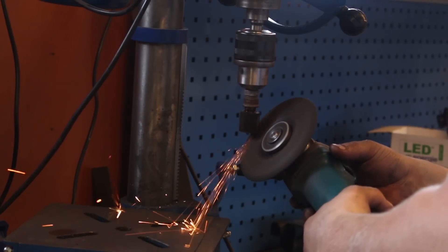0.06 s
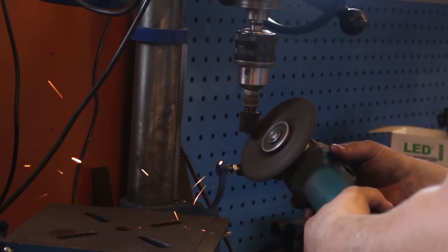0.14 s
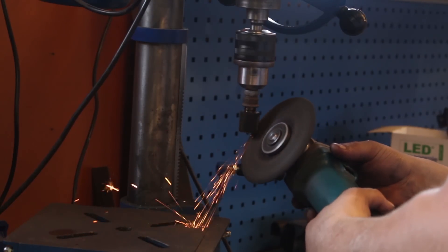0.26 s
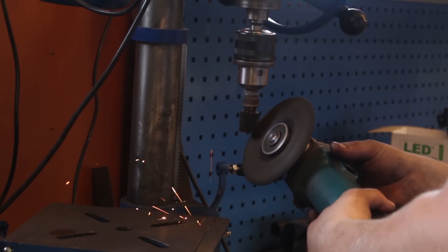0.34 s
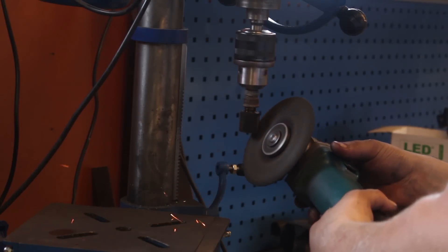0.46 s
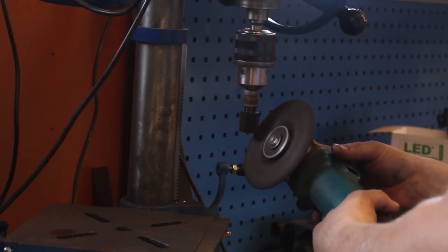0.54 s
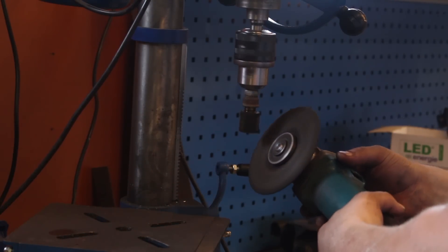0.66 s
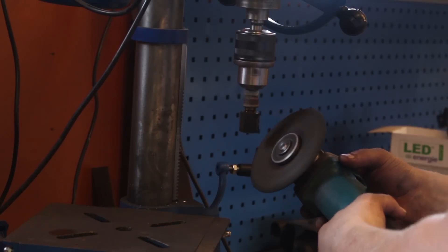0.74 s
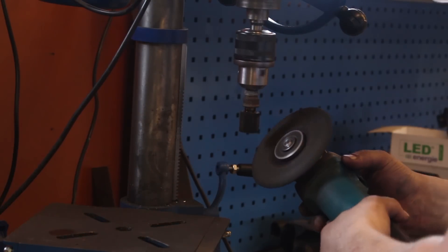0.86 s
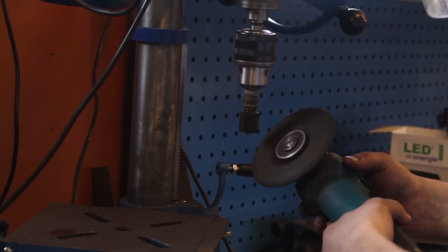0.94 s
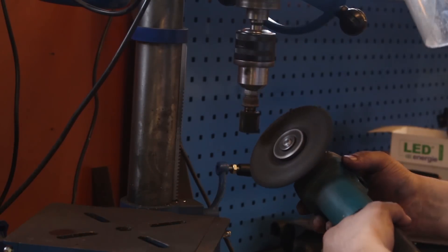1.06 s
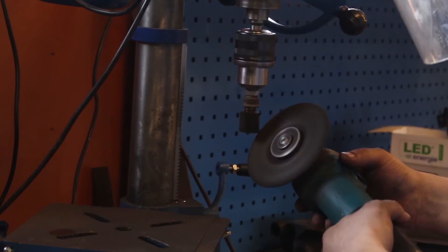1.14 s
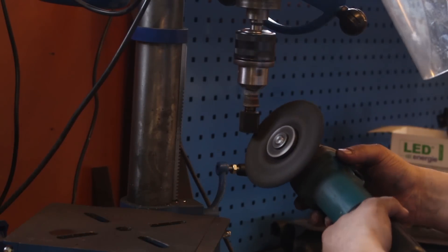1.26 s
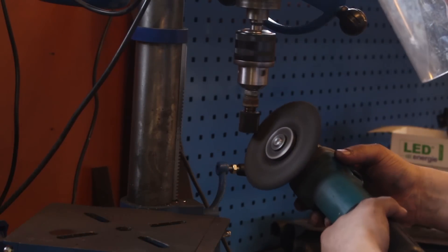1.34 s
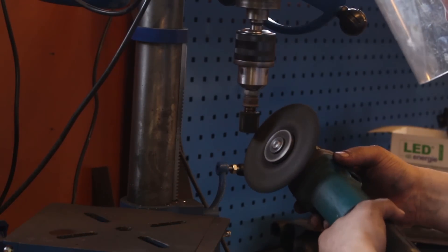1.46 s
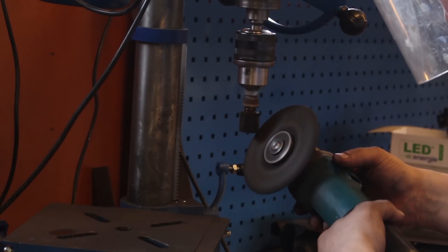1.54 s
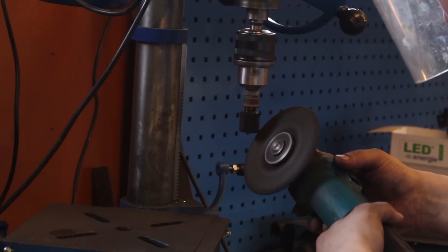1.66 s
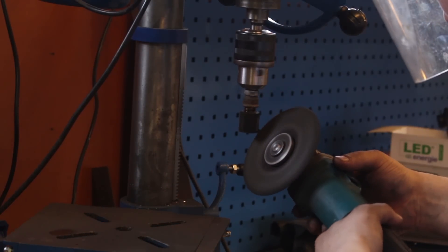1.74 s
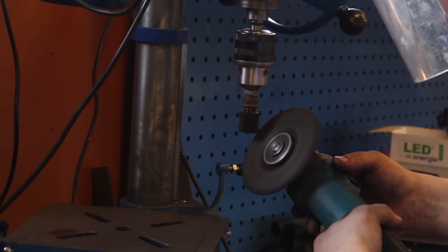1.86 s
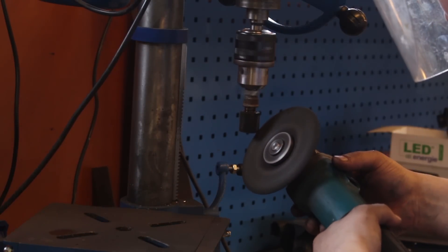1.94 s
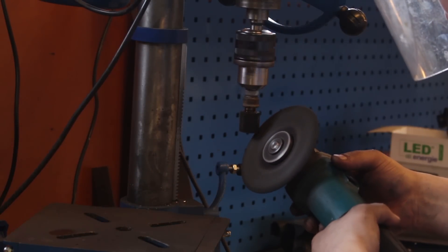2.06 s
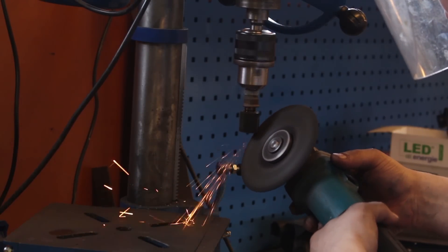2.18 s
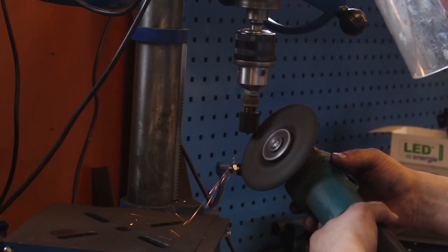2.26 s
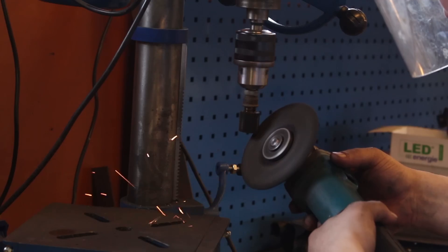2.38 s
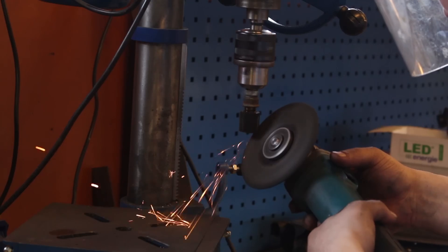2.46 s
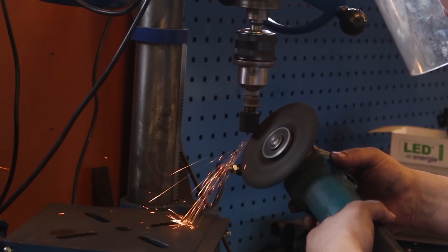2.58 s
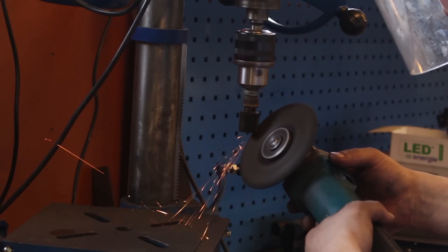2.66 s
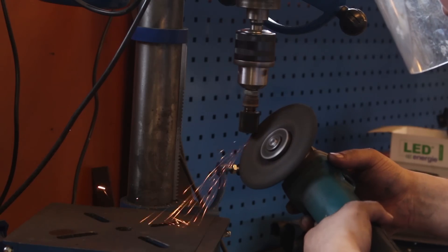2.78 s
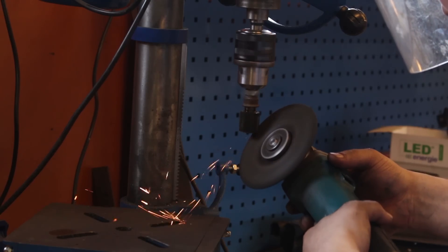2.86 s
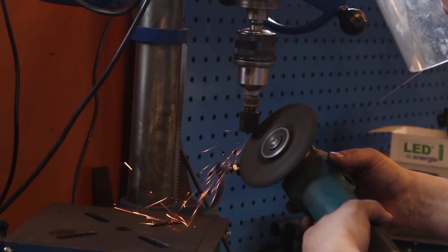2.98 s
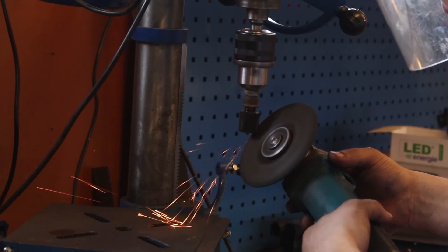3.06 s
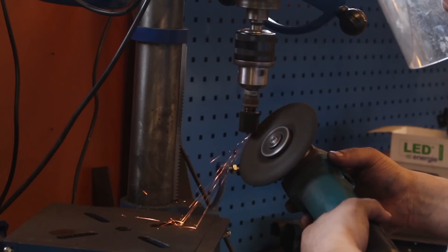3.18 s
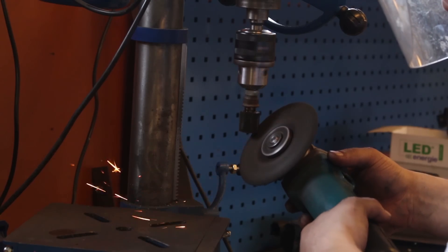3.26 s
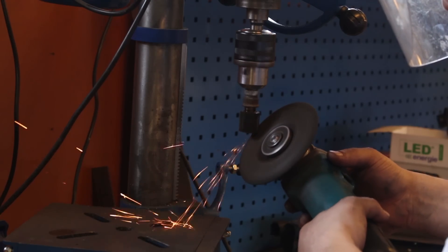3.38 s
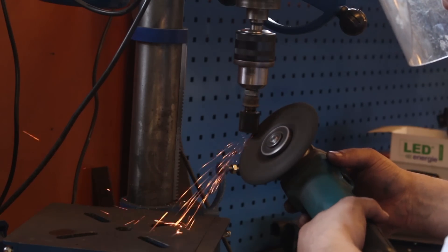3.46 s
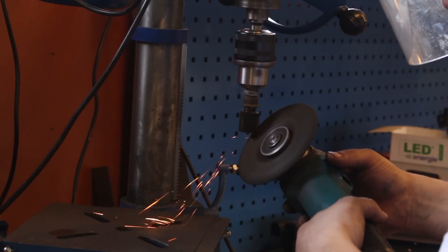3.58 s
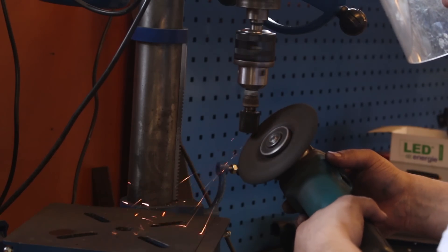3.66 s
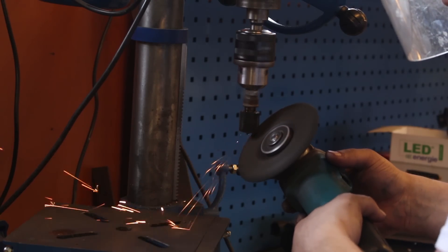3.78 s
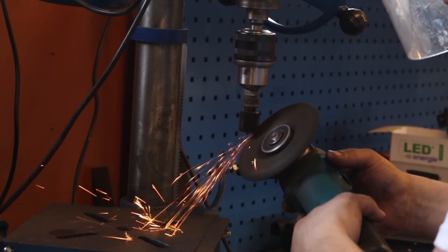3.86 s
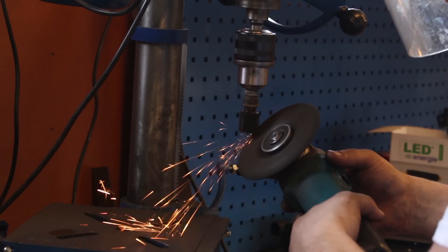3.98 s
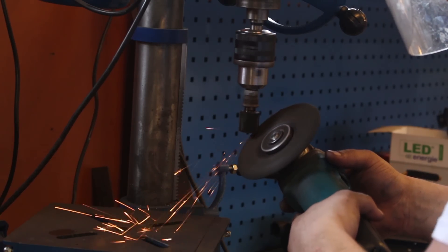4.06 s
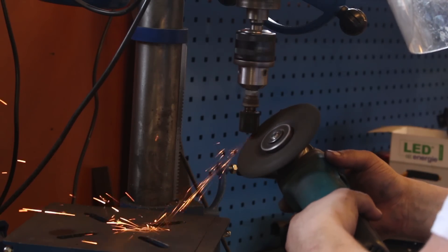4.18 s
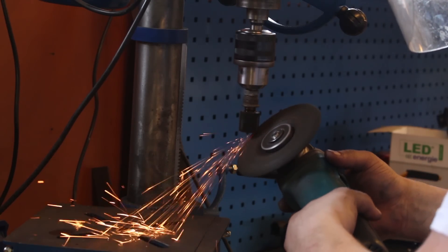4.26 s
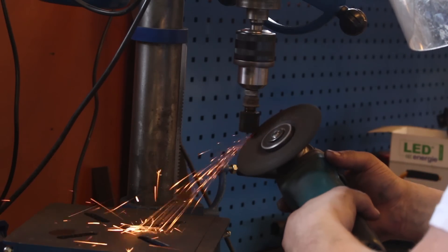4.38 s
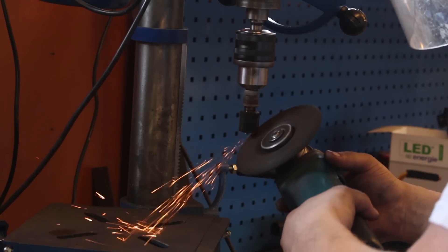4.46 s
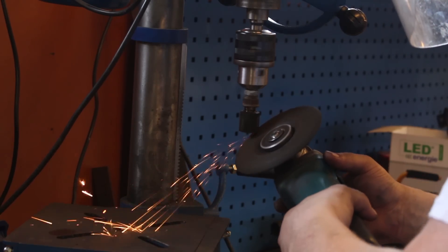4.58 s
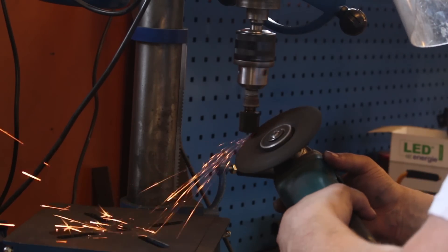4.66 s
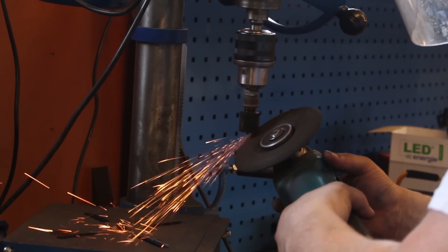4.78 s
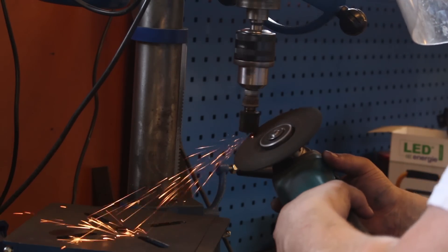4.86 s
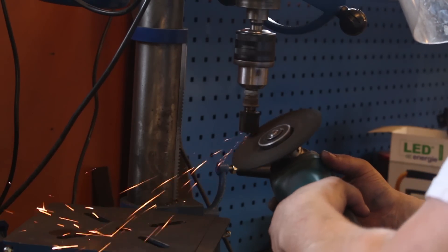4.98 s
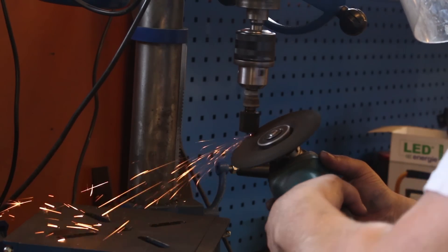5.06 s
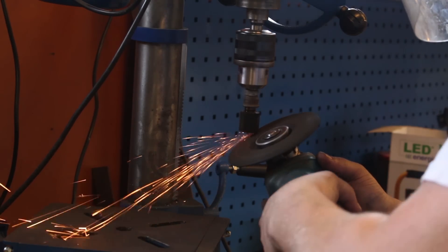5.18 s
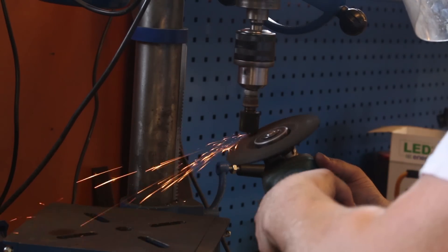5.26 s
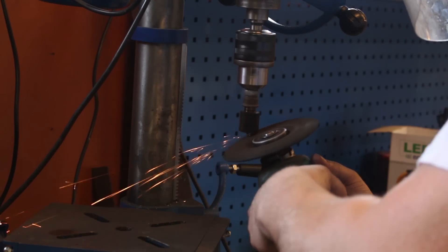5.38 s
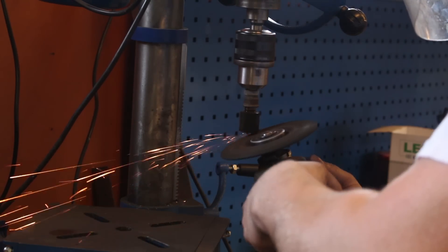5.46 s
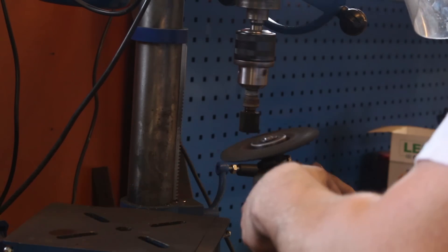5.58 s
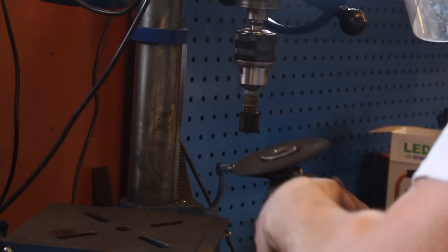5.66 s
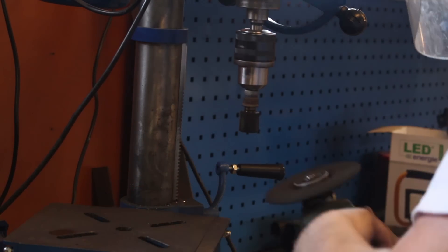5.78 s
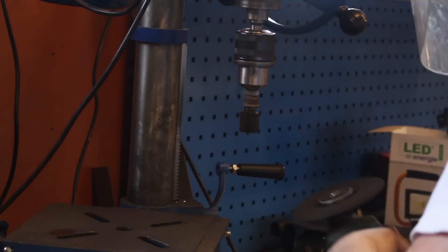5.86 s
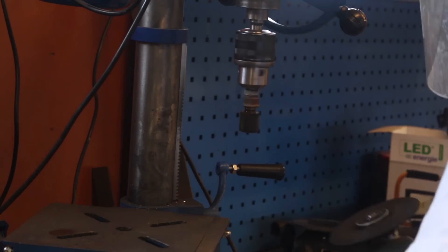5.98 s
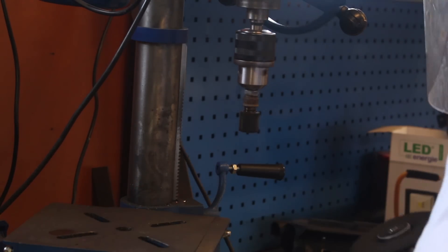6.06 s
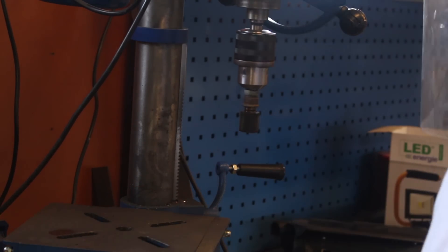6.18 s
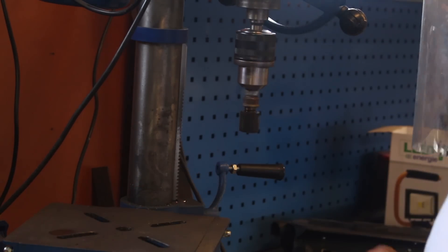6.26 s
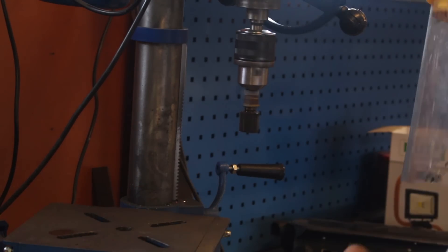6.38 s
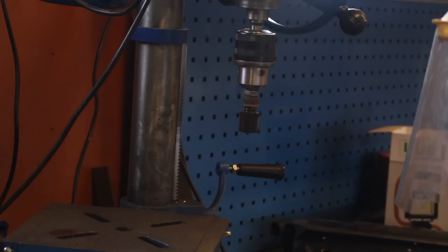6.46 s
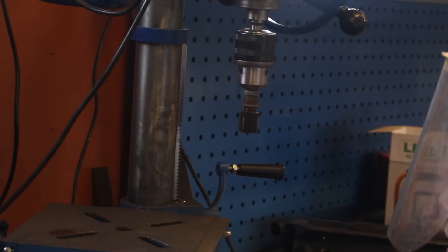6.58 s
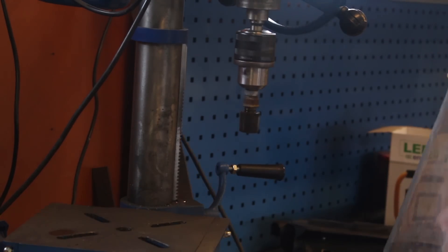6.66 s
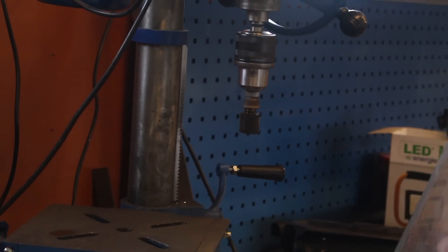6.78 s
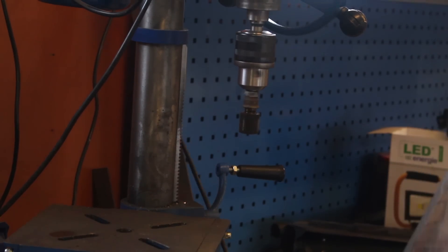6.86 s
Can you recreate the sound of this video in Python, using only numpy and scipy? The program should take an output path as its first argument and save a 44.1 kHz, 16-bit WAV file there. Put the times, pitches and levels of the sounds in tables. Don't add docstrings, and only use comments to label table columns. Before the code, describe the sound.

A close, slightly wide pickup in a small workshop. From 0 to about 0.6 s an angle grinder bites unevenly into a spinning steel part: loud, rough, buzzing chatter with bright metallic cracks, a low drone from the press column and soft low bumps at the very start. From 0.6 to 2.2 s it runs free, a steady gritty motor roar with a whine near 1.2 kHz and airy fan hiss over faint press hum. At 2.2 s grinding resumes in short stuttering rasps, getting denser through 3 to 4.4 s. From about 4.45 s the cuts pulse regularly, seven or eight a second, more ringing and singing, as the pitch sags slightly. Contact stops near 5.6 s. The motor changes colour as it turns away, weakens and slows; a faint, very high falling whistle appears around 6.65 s, with a small low bump near 6.9 s.

```python
import sys
import numpy as np
from scipy import signal
from scipy.fft import rfft, irfft
from scipy.io import wavfile
from scipy.ndimage import uniform_filter1d

SR = 44100
rng = np.random.default_rng(int(sys.argv[2]) if len(sys.argv) > 2 else 0)


def invert_db(x):
    u = np.asarray(x, float) / 20
    return 10 ** u


def wav_record(signal):
    frames = np.transpose(np.atleast_2d(signal))
    bounded = np.clip(frames, -1, 1)
    quanta = np.round(bounded * 32767).astype(np.int16)
    wavfile.write(sys.argv[1], SR, quanta)


N = 305172
TIME = np.arange(N) / SR
PART_TURNS_PER_S = 7.6

# time in seconds, turns a second.
DISC_SPEED = [(0, 160), (.55, 160), (.7, 165.6), (2.2, 165.6), (2.65, 164), (2.95, 164.3), (3.1, 163.1),
              (3.55, 162.2), (4.45, 158.9), (5.05, 157.35), (5.8, 156.5), (6.92, 144)]
# time in seconds, push in dB, lean of the disc from 0 to 1.
SECOND_PASS = [(2.17, -23, 0), (2.228, -37, 0.12), (2.236, -28.5, 0.44), (3.15, -25.5, 0.29),
               (3.8, -30.5, 0.47), (4.4, -32, 0.72), (5.1, -33, 0.81), (5.605, -36.5, 0.94), (5.63, -41, 1)]


def rms_one(x):
    return x / np.sqrt(np.mean(x ** 2) + 1e-20)


def in_time(rows):
    s, *columns = np.transpose(rows)
    return [np.interp(TIME, s, column) for column in columns]


def swell_at(s, length_s, db):
    return invert_db(db) * np.exp(-((TIME - s) / length_s) ** 2)


def noise():
    return rng.standard_normal(N)


def coloured(x, points, peaks=()):
    hz = np.fft.rfftfreq(len(x), 1 / SR) + 1
    outline_hz, outline_db = np.array(points).T
    shape_db = np.interp(np.log(hz), np.log(outline_hz), outline_db)
    for top_hz, width_hz, boost_db in peaks:
        shape_db = shape_db + boost_db / (1 + (2 * (hz - top_hz) / width_hz) ** 2)
    return irfft(rfft(x) * invert_db(shape_db), len(x))


def drift(rate):
    r = np.exp(-80 * np.pi * rate / SR)
    steps = rng.standard_normal(N // 40 + 2002)
    slow = signal.lfilter([1], [1, -2 * r, r * r], steps)[2000:]
    return np.interp(np.arange(N) / 40, np.arange(len(slow)), rms_one(slow))


def resonate(x, hz, width_hz):
    r, w = np.exp(-np.pi * width_hz / SR), 2 * np.pi * hz / SR
    ring = signal.lfilter([.5, 0, -.5], [1, -2 * r * np.cos(w), r * r], x + 1e-18)
    return ring / np.sin(w)


def press():
    # pitch in Hz, level in dB rms.
    hum_lines = [
        (53.6, -81),
        (100, -66),
        (107.5, -75.5),
        (200, -62),
        (207.5, -87),
    ]
    hum = 0
    for hz, db in hum_lines:
        strength = invert_db(db + 1.0 + 0.56 * drift(3.0))
        hum = hum + strength * np.sin(2 * np.pi * hz * TIME + 0.5 * drift(4.6))
    return hum


def column():
    # middle in seconds, length in seconds, level in dB rms.
    column_swells = [(0.058, 0.079, -41.5), (0.25, 0.048, -39), (0.424, 0.089, -40), (0.563, .03, -46),
                     (0.704, 0.027, -51), (2.473, 0.072, -49), (2.78, 0.078, -51), (2.968, 0.049, -48),
                     (3.1, 0.079, -51), (3.24, .025, -45.5), (3.328, 0.017, -46.5), (3.605, 0.069, -58),
                     (3.747, .03, -54), (3.866, 0.026, -45.5), (3.99, 0.031, -48), (4.17, 0.026, -48),
                     (4.33, 0.14, -50), (4.432, 0.059, -48), (4.554, .04, -41.5), (4.736, 0.06, -41),
                     (4.915, 0.05, -43.5), (5.095, 0.083, -45), (5.333, 0.059, -43.5), (5.438, 0.09, -48.5),
                     (5.596, 0.076, -45), (6.152, .04, -52), (6.72, 0.064, -53), (6.882, .02, -55)]
    swell = sum(swell_at(s, length_s, db + 3.5) for s, length_s, db in column_swells)
    drone = swell * np.sin(2 * np.pi * 359.5 * TIME + 0.88 * drift(6.2))
    late = np.interp(TIME, [4.3, 4.55, 5.58, 5.65], [0, 1, 1, 0])
    table_rumble = rms_one(resonate(noise(), 315.5, 18))
    return drone + late * invert_db(-51.5) * table_rumble


def motor():
    # time in seconds, roar in dB, how far the tool is turned away from 0 to 1.
    motor_course = [(0, -26.5, 0.22), (.3, -23.5, 0.35), (.55, -24, 0.12), (.65, -29, 0.13),
                    (.8, -30, 0.14), (1.8, -29, 0.07), (4.3, -28.5, 0.14), (5.4, -30, 0.2),
                    (5.9, -31, 0.17), (6.3, -34, 0.28), (6.92, -35, 0.6)]
    # pitch in Hz, strength in dB per Hz.
    near_colour = [(24, -70), (40, -53), (101, -34), (133, -17.5), (195, -22), (422, -13), (500, -10.5),
                   (815, -9), (872, -6.5), (1230, -2), (1440, -4.5), (4360, 3), (9000, -13.5),
                   (11700, -27.5), (19800, -120)]
    away_colour = [(24, -53), (40, -39), (167, -11), (200, -5), (234, -18), (352, -2), (386, -14.5),
                   (495, -5), (796, 0.5), (1120, 0), (1570, 1.5), (1880, 3.5), (9000, -11.5), (11700, -50),
                   (19800, -120)]
    # pitch in Hz, strength in dB per Hz.
    hiss_colour = [(5000, -23), (7000, -21), (8500, -4.5), (10500, 3.5), (12000, 1), (13500, -6),
                   (16000, -11)]
    housing_hz = [300, 355, 420, 800, 1066, 1320, 1890, 2025, 2260, 2940, 3385, 3545, 3800, 4400, 4780,
                  5270, 7310, 9600, 10700, 11150]
    # width in Hz, boost in dB facing us, boost in dB turned away.
    housing_boosts = [(20, 3.2, 1.5), (27.778, 8.2, 3), (28, 8.2, 12), (50, 7.4, -39), (32.407, 9.4, -30),
                      (55.556, 5.1, -25), (73, 5.3, 1.5), (83, 7.1, -12), (60, 6.4, -40),
                      (138.89, 2.3, 5.5), (109, 1.6, -19), (149, 4, 9.5), (70, 3.6, 5), (129.6, 0.44, 3),
                      (200, 1, 8.5), (90, 6.5, 3), (86.4, 8.2, 7), (90, 16, 0), (120, 5, -1), (90, 23, 21)]

    roar_db, away = in_time(motor_course)
    hiss_db = roar_db - 9 - 2 * away
    away = np.clip(away, 0, 1)
    housing = np.column_stack([housing_hz, housing_boosts])
    near = rms_one(coloured(noise(), near_colour, housing[:, [0, 1, 2]]))
    far = rms_one(coloured(noise(), away_colour, housing[:, [0, 1, 3]]))
    roar = (np.sqrt(1 - away) * near + np.sqrt(away) * far) * invert_db(roar_db + 0.5 * drift(31))

    speed, = in_time(DISC_SPEED)
    whine_hz = 1220 - 4.3 * (speed.max() - speed)
    whine_db = roar_db - 21 - 26 * away
    phase = 2 * np.pi * np.cumsum(whine_hz) / SR
    rough_tone = (.6 + .8 * drift(13)) * np.sin(phase) + .8 * drift(13) * np.cos(phase)
    whine = invert_db(whine_db + 6) * rough_tone

    hiss = rms_one(coloured(noise(), hiss_colour)) * invert_db(hiss_db + 0.85 * drift(30))
    return roar + whine + hiss


def vents():
    # middle in seconds, length in seconds, pitch in Hz, width in Hz, level in dB rms.
    vent_lifts = [(5.61, 0.046, 3960, 220, -33), (5.63, 0.74, 4700, 1000, -40.5),
                  (4.7, 0.079, 4000, 660, -43), (5.82, 0.19, 4800, 330, -42), (6.25, 0.073, 1370, 60, -42),
                  (6.22, .06, 3900, 66, -55), (6.4, 0.087, 2700, 220, -45), (6.25, 0.14, 6700, 400, -45.5),
                  (4.3, 0.11, 13000, 900, -46), (6.7, .15, 3400, 200, -44), (6.87, 0.053, 940, 53, -46.5),
                  (3.1, 0.054, 870, 57, -49), (5.72, 0.12, 1300, 35, -52), (6.27, 0.25, 1147, 60, -42.5),
                  (5.71, 0.056, 1155, 40, -44), (5.82, .12, 3900, 120, -43), (1.54, .12, 3480, 120, -37)]
    lifted = 0
    for s, length_s, hz, width_hz, db in vent_lifts:
        lifted = lifted + swell_at(s, length_s, db) * rms_one(resonate(noise(), hz, width_hz))
    return lifted


def whistle():
    # time in seconds, pitch in Hz, level in dB rms.
    whistle_course = [(6.65, 15600, -72), (6.68, 15640, -60), (6.72, 15700, -63), (6.765, 15320, -60),
                      (6.82, 15150, -64), (6.845, 15050, -55), (6.9, 14900, -66)]
    hz, whistle_db = in_time(whistle_course)
    on = np.interp(TIME, [6.64, 6.66, 6.88, 6.91], [0, 1, 1, 0])
    phase = 2 * np.pi * np.cumsum(hz * (1 + .002 * drift(40))) / SR
    return on * invert_db(whistle_db + 4 + 2.5 * drift(30)) * np.sin(phase)


def handling():
    # middle in seconds, level in dB, length in seconds.
    hand_bumps = [
        (0.02, -32, 0.055),
        (0.092, -42, 0.05),
        (.35, -50, .2),
        (6.896, -48, .03),
    ]
    lumps = sum(swell_at(s, length_s, db) for s, db, length_s in hand_bumps)
    return lumps * rms_one(coloured(noise(), [(15, -7), (40, -16), (110, -16), (250, -19)]))


def listed_bites():
    # start in seconds, length in seconds, depth in dB,
    # load on the guard in dB.
    uneven_bites = [(0.002, 0.012, -1.5, -6.0), (0.021, 0.026, -3.5, -8), (0.046, 0.006, 4.5, -4),
                    (0.052, 0.012, -4.0, -4.0), (0.065, 0.019, 1.5, 7), (0.108, 0.012, -1, -1),
                    (0.133, 0.006, 0, 4), (0.14, 0.012, -4.0, -3), (0.152, 0.021, -2, -2),
                    (0.171, 0.006, -4, -3.0), (0.177, 0.012, -1, 1.0), (0.196, 0.021, 4.5, 6),
                    (0.215, 0.006, -6, 2), (0.221, 0.019, -7.0, 7), (0.24, 0.012, -1.5, 0),
                    (0.265, 0.012, 0, 9), (0.277, 0.006, 4, 1.0), (0.283, 0.019, 1.5, -2.0),
                    (0.302, 0.006, -6.0, -8.0), (0.308, 0.006, 3, -2.0), (0.315, 0.012, -7, -4.0),
                    (0.327, 0.012, 3.0, 13), (0.34, 0.006, 0, 1), (0.371, 0.006, -4, 3.0),
                    (0.377, 0.006, 3, -4.0), (0.383, 0.019, -7, -4.0), (0.402, 0.012, 7, 2.0),
                    (0.421, 0.012, 3, 2.0), (0.433, 0.012, -8, -4.0), (0.446, 0.006, 8, -2.0),
                    (0.452, 0.012, -7, -8), (0.465, 0.012, 7.5, 8), (0.477, 0.012, -10, -8.0),
                    (0.502, 0.019, 2, 1.0), (0.54, 0.012, 5, 1.0), (0.552, 0.025, -4, -4.0),
                    (2.185, 0.012, -5.0, -2.0), (2.232, 0.0164, 1.5, -4), (2.251, 0.006, -13, -6.0),
                   (2.258, 0.019, 1.5, 1), (2.276, 0.019, -13, 0), (2.294, 0.019, 2.5, 3),
                   (2.312, 0.006, -8, -3.0), (2.379, 0.031, 1.5, -6), (2.409, 0.019, -6.0, -10),
                   (2.427, 0.019, 1, 0), (2.445, 0.006, -6.0, -11), (2.482, 0.012, -3.0, 5),
                   (2.506, 0.038, 0, 3.5), (2.549, 0.006, -9, -2.0), (2.555, 0.023, 2.5, 2.0),
                   (2.579, 0.006, -6.0, -2), (2.616, 0.006, 3, 2), (2.622, 0.006, -10.0, -1.0),
                   (2.628, 0.016, -1.5, 3), (2.652, 0.012, 4, 5.5), (2.664, 0.019, -6.0, -6),
                   (2.683, 0.006, -9, -4.0), (2.689, 0.019, 1, -1.0), (2.707, 0.006, -9.0, -5.0),
                   (2.738, 0.006, -4.0, -3.0), (2.744, 0.006, 3, 5), (2.75, 0.006, -9.0, 4.5),
                   (2.762, 0.019, -3, -5), (2.78, 0.03, 2, 2), (2.811, 0.006, -10, -7),
                   (2.823, 0.012, 0.5, 5.5), (2.835, 0.006, -11.0, -3), (2.866, 0.012, 1, -6),
                   (2.878, 0.012, -17, -8.0), (2.89, 0.047, 0.0, 4), (2.933, 0.012, -8.0, 3),
                   (2.952, 0.01, 2.5, 3), (2.97, 0.006, 0, -2), (3.001, 0.016, -0.5, -5),
                   (3.031, 0.011, -1.5, 4), (3.05, 0.017, 0, 6), (3.081, 0.018, -1, 4),
                   (3.135, 0.012, -2, -7), (3.16, 0.019, 1.5, 2), (3.178, 0.006, -10, -10),
                   (3.184, 0.0088, 1, 6), (3.197, 0.006, -7, -6), (3.209, 0.006, -8, -6),
                   (3.215, 0.025, 0, -1.0), (3.264, 0.019, -3, 3),
                    (3.289, 0.028, 0, 2.5), (3.32, 0.012, 0.5, 4.5), (3.344, 0.021, 0, -4.0),
                   (3.387, 0.037, -5, -4.0), (3.424, 0.006, 3, 2), (3.43, 0.019, -5, 4.5),
                   (3.449, 0.012, 1.5, -3.0), (3.461, 0.006, -2, 2), (3.473, 0.019, -0.5, 0),
                   (3.492, 0.012, -6.0, -4.0), (3.51, 0.006, -6, -10.0), (3.523, 0.012, -8, 5),
                   (3.535, 0.006, 2, -10.0), (3.554, 0.037, 0, 1.5), (3.615, 0.006, 3.5, 4),
                   (3.621, 0.006, -5.0, -8.0), (3.665, 0.012, 2, 4), (3.677, 0.012, -10, -1),
                   (3.689, 0.027, -1, -12), (3.72, 0.019, -5, 1), (3.739, 0.025, -0.5, 1.5),
                   (3.782, 0.01, 0.0, -9), (3.795, 0.006, -6.0, 3), (3.801, 0.006, 3, 6.5),
                   (3.82, 0.012, 1.5, -1), (3.832, 0.012, -5, 2), (3.844, 0.02, 0.5, 7),
                   (3.869, 0.014, 1, 5), (3.906, 0.012, 0.0, -8.0), (3.925, 0.012, 1.0, 6),
                   (3.95, 0.012, 0, 5), (3.969, 0.013, 2.5, 3.0), (3.981, 0.012, -4, -3),
                   (4.0, 0.047, -4, 1), (4.056, 0.031, -5, -1), (4.087, 0.012, 0.5, 2),
                   (4.106, 0.012, 0, -1), (4.118, 0.006, -8, -2), (4.131, 0.006, 1, -9),
                   (4.143, 0.006, -1, -4), (4.15, 0.043, -6, -6.0), (4.193, 0.019, -4, -8),
                   (4.212, 0.019, 0.5, -2), (4.237, 0.011, 1.5, -3), (4.25, 0.006, -9, 1),
                   (4.262, 0.049, -6, -6), (4.325, 0.012, -1.5, -2.0), (4.344, 0.039, -2, 5),
                   (4.394, 0.027, -1, 1), (4.432, 0.019, -7, -5)]
    depth_db, load_db = np.full(N, -15.5), np.full(N, -4.0)
    for s, length_s, bite, load in uneven_bites:
        span = slice(max(round(s * SR), 0), round((s + length_s) * SR))
        depth_db[span], load_db[span] = bite, load
    return depth_db, load_db


def bulge_db(unround, start_s, fall_db):
    # angle in turns, width in turns, height in dB, wear in dB a second.
    bulges = [
        (.065, 0.046, 0.5, 0.7),
        (.22, 0.075, 4, 1.7),
        (.445, 0.085, 9, 5.5),
        (.55, .055, 3, 2),
        (.85, 0.11, 1, 1.6),
    ]
    luck = rng.standard_normal((60, len(bulges)))
    coarse = slice(0, N, 32)
    t = TIME[coarse]
    depths = []
    for k, (angle, width, height_db, wear_db) in enumerate(bulges):
        ahead = PART_TURNS_PER_S * t - angle
        turn = np.round(ahead).astype(int)
        top_db = height_db - wear_db * (t - start_s) - 0.5 * unround[coarse] * luck[turn, k]
        depths.append(top_db - fall_db * ((ahead - turn) / width) ** 4)
    deepest_db = np.interp(TIME, t, np.max(depths, axis=0))
    return np.maximum(deepest_db, -16 * unround)


def singing(blows):
    # middle in seconds, length in seconds, pitch in Hz, width in Hz.
    sung_rings = [(5.0, .1, 6540, 130), (5.05, .12, 10500, 150), (5.0, .13, 10850, 150),
                  (5.45, .16, 11500, 70), (4.9, .22, 7740, 70), (4.65, .3, 8980, 100),
                  (5.3, .22, 9170, 110), (4.36, .14, 8290, 80), (4.12, .05, 5620, 130),
                  (4.6, .08, 5560, 130), (5.57, .04, 6650, 150), (4.78, .06, 8080, 100),
                  (3.55, .25, 8090, 100), (3.85, .06, 8020, 90), (5.0, .15, 8180, 100),
                  (3.7, .25, 1775, 60), (5.35, .25, 1725, 40), (4.75, .12, 1960, 220),
                  (.075, .013, 1790, 110), (.208, .014, 1770, 100), (.46, .02, 5750, 220),
                  (3.07, .07, 5580, 200), (4.1, .025, 1770, 90), (4.24, .035, 1770, 80),
                  (4.51, .025, 1770, 90), (4.92, .08, 5550, 160), (3.9, .9, 3660, 160)]
    sung_db = [4, -1, -2, 0, -11, -5, -6, 2, -3, -13, 6, -4, -9, -6, -4, -21, -25, -10, -14, -14.5, 1.5, -6,
               -11, -11, -12, -4, -4]
    song = 0
    for (s, length_s, hz, width_hz), db in zip(sung_rings, sung_db):
        song = song + resonate(blows * swell_at(s, length_s, db), hz, width_hz)
    return song


def crack(blows):
    fade = np.exp(-1 / (0.00034 * SR))
    burst = signal.lfilter([1], [1, -fade], blows) * noise()
    bright = signal.butter(2, 2200, "high", fs=SR, output="sos")
    return invert_db(-9) * signal.sosfilt(bright, burst)


def grinding(rows, spot_s, ring_db, guard_db, shake_db):
    # time in seconds, out-of-roundness from 0 to 1.
    roundness = [(0, .9), (2.2, .9), (3.6, .75), (4.4, .45), (5.7, .35)]
    lean_load = [(0, 0), (.25, .35), (.5, 1), (1, .8)]
    ring_hz = [1600, 2590, 3000, 3550, 4200, 4840, 5560, 5780, 6200, 6520, 7110, 7730, 8050, 8280, 8620,
               8880, 9120, 10200, 10680, 11550, 13500]
    # width in Hz, then its level in dB at each of the four ring times.
    ring_rows = [(306, -16, -31, -49, -29), (205, -29, -16.5, -49, -28), (256, -10.5, -18, -49, -27),
                 (325, -10, -9, -0.5, -2), (300, -6.5, -13.5, -2.5, -3), (250, -11, -13, -8, 1),
                 (221, -5.5, -8.5, -1, 4), (230, -10, -9, 0.5, 3), (306, -1, -9.5, -5, 4.5),
                 (247, -21, -5.5, -4, 0), (250, -12, -24, -13, 0), (147, -30, -7, -6, -8),
                 (195, 3, -6, 2.5, 3.5), (148, -29, -7, 2, -3), (130, -27, -11, -5.5, -14),
                 (183, 1, -7.5, -7, -18), (190, -8, -21, -14, 2), (297, -14, -5.5, -4, -1),
                 (240, -3, -5.5, 0.5, 2.5), (198, -4, -8, -3, -12), (1800, -6, -7, 0, 4)]
    ring_times = [.3, 3, 4.3, 5.3]

    push_db, lean = in_time(rows)
    unround, = in_time(roundness)
    touching = (TIME >= rows[0][0]) & (TIME < rows[-1][0])
    regular = TIME > 4.451
    throb_db = regular * np.cos(2 * np.pi * (PART_TURNS_PER_S * TIME - .19))
    leaning_db = 11 * np.interp(lean, *np.transpose(lean_load))
    guard_level_db = 0.46 * push_db + leaning_db + throb_db

    turns = np.cumsum(in_time(DISC_SPEED)[0]) / SR
    turns = turns - turns[round(spot_s * SR)] % 1 + 1 + .007 * unround * drift(12)
    at = np.flatnonzero((np.diff(np.floor(turns), prepend=0) > 0) & touching)

    depth_db, load_db = listed_bites()
    depth_db = np.where(regular, bulge_db(unround, SECOND_PASS[0][0], fall_db=21.0), depth_db)
    load_db = np.where(regular, 0.37 * depth_db, 1.96 * load_db - 5.5)
    cut_db = push_db + depth_db

    chance = np.clip(rng.standard_normal((len(at), len(ring_rows) + 1)), -2, 2) * unround[at, None]
    colour = uniform_filter1d(chance, size=3, axis=0)
    patches_db = 18 * uniform_filter1d(chance, size=12, axis=0) * regular[at, None]

    blows = np.zeros(N)
    blows[at] = invert_db(cut_db[at] + 1.2 * np.minimum(chance[:, -1], .7))
    fade = np.exp(-1 / (0.00063 * SR))
    scrape = signal.lfilter([1], [1, -fade], blows)
    scrape = scrape + .05 * invert_db(cut_db) * touching
    grit = noise()

    early = (turns[at] % 1) * SR / 160
    rings = 0
    for k, (hz, (width_hz, *levels_db)) in enumerate(zip(ring_hz, ring_rows)):
        strength = blows[at] * invert_db(2.0 * colour[:, k] + patches_db[:, k])
        knock = np.zeros(N)
        knock[at] = strength * np.clip(early, 0, 1)
        knock[at + 1] = strength * np.clip(1 - early, 0, 1)
        rub = 0.19 * unround * scrape * np.roll(grit, 997 * k)
        force = (knock + rub) * invert_db(np.interp(TIME, ring_times, levels_db))
        rings = rings + (-1) ** k * resonate(force, hz, width_hz)
    rings = rings + crack(blows * unround ** 2) + singing(blows)

    shaken = blows * invert_db(0.62 * drift(29) + load_db + 0.52 * push_db - cut_db)
    shaken = shaken + .14 * scrape * invert_db(-.6 * cut_db) * noise()
    guard = resonate(shaken, 1785, 90) + .9 * resonate(shaken, 1945, 100)

    shake = touching * invert_db(push_db + shake_db + 2.1 * drift(31)) * np.sin(2 * np.pi * turns)
    return rings * invert_db(ring_db) + rms_one(guard) * invert_db(guard_level_db + guard_db) + shake


def workshop(x, t60):
    age = np.arange(round(t60 * SR)) / SR
    tail = rng.standard_normal(len(age)) * invert_db(-60 * age / t60) * (age > .001)
    colour = rfft(tail, 2 * len(age))
    size = np.abs(colour)
    tail = irfft(colour / (size + .2 * size.mean()))[:len(age)]
    return signal.fftconvolve(x, tail / np.sqrt(np.sum(tail ** 2)))[:N]


def scene():
    # time in seconds, push in dB, lean of the disc from 0 to 1.
    first_pass = [(0, -24, 0.8), (.1, -23.5, 0.47), (.2, -23, .55), (.3, -24, 0.47), (.42, -25.5, 0.2),
                  (.48, -25.5, .25), (.53, -28, 0.4), (.59, -37, .5)]
    # pitch in Hz, sides against middle in dB.
    side_colour = [(60, -12), (150, -8.5), (350, -13.5), (800, -17.5), (1600, -15.5), (3200, -11),
                   (6000, -11.5), (9500, -6), (12500, -9.5), (15500, 0)]
    contact = grinding(first_pass, spot_s=.0052, ring_db=0.5, guard_db=-53, shake_db=-37)
    contact = contact + grinding(SECOND_PASS, spot_s=2.503, ring_db=4.5, guard_db=-37.5, shake_db=-35.5)
    steady = motor() + vents() + whistle() + handling()
    hum = press() + column()
    mid = steady + hum + contact + invert_db(-8.5) * workshop(contact, 0.039)
    reflections = 1.44 * workshop(steady, 0.4) + workshop(contact, 0.063)
    side = coloured(reflections, side_colour) - 0.086 * hum
    return np.array([mid + side, mid - side]) * invert_db([[-.15], [.15]])


def top_cut(x):
    return signal.sosfilt(signal.butter(12, 15860, fs=SR, output="sos"), x)


def record(dry):
    return top_cut(dry)


dry = scene()
out = record(dry)
wav_record(out)
```